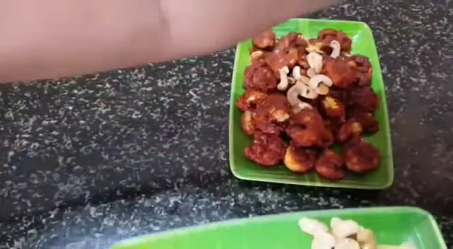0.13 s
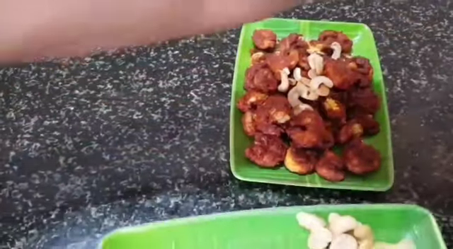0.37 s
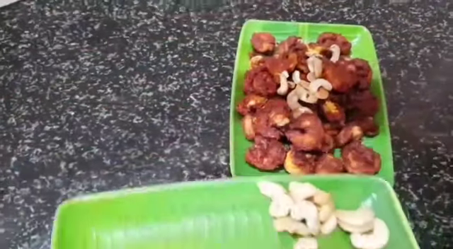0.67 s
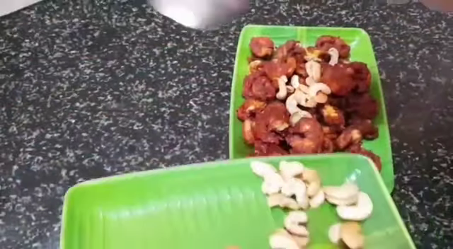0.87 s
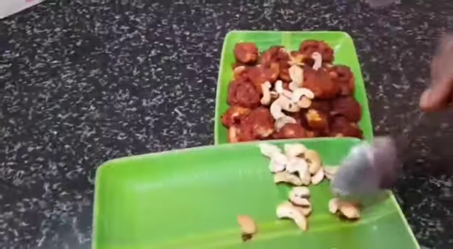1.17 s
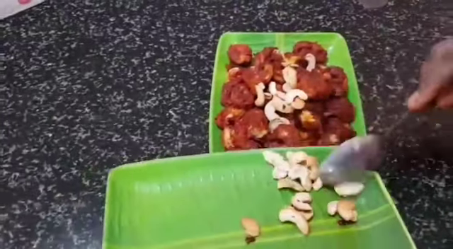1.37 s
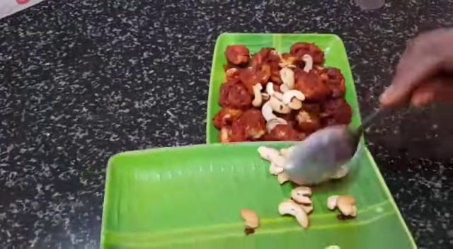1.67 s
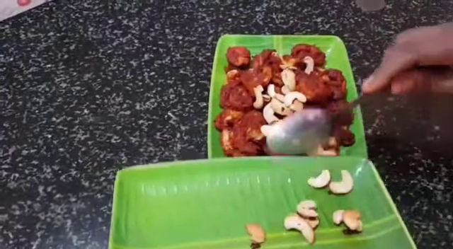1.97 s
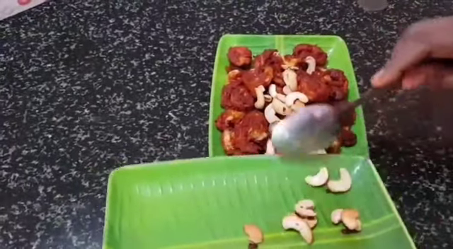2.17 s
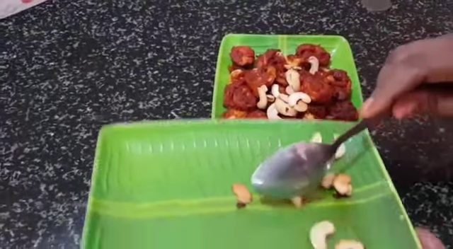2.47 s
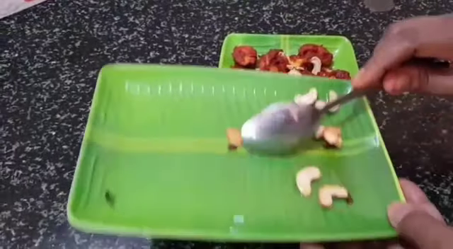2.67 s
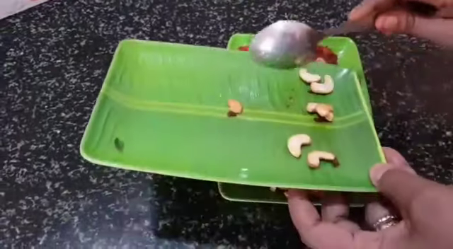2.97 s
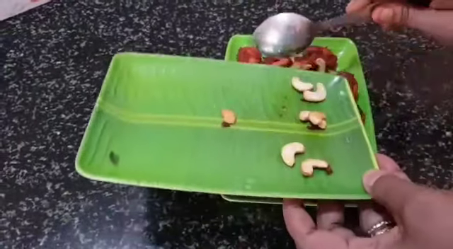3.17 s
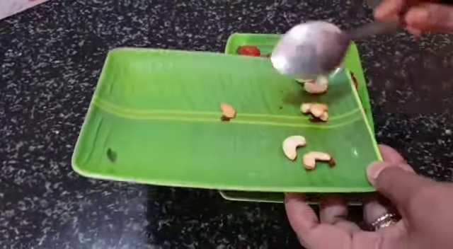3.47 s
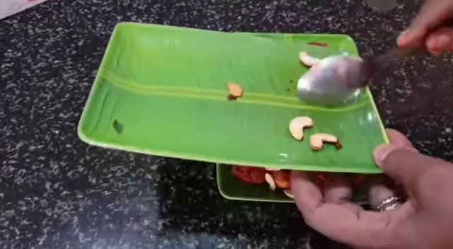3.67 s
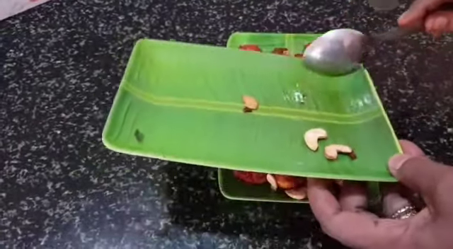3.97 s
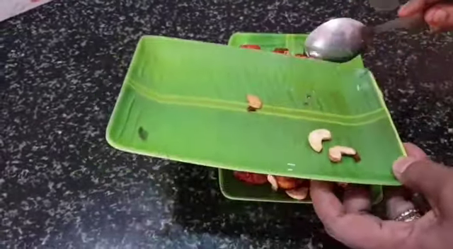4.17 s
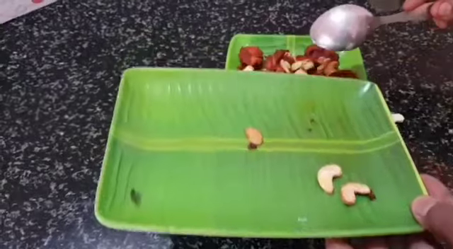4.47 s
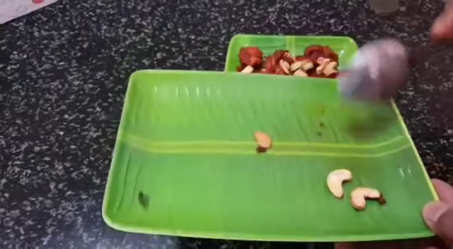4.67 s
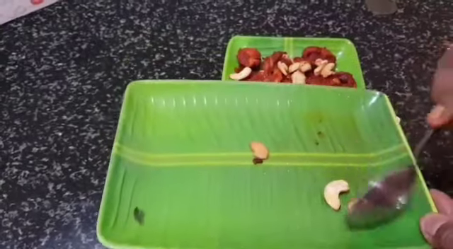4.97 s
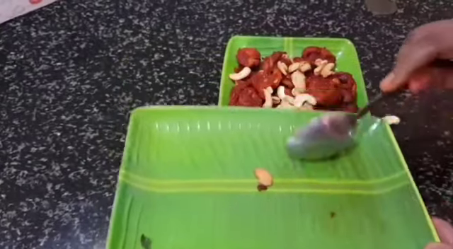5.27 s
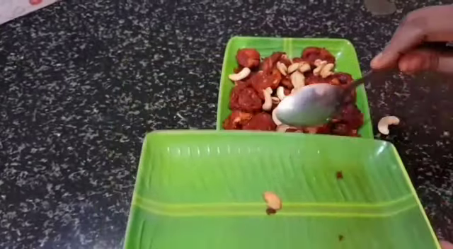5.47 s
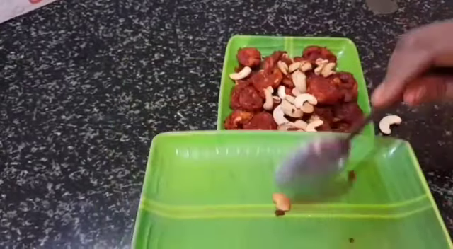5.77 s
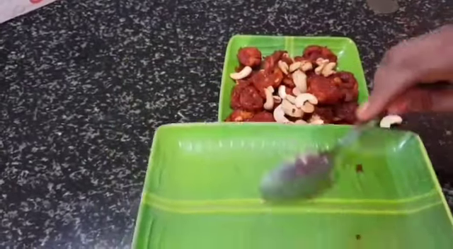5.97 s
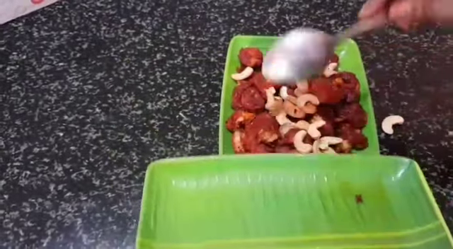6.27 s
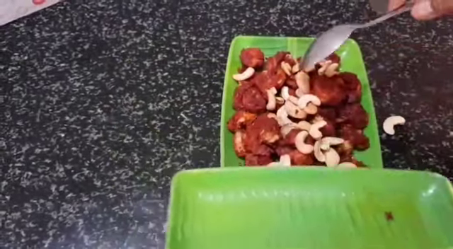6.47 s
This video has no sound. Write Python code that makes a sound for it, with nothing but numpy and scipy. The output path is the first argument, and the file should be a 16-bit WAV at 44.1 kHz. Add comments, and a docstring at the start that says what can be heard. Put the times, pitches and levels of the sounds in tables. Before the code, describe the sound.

Quiet room air with low rumble at first; small high metallic jingles, a muffled handling bump on the right, then delicate nut taps. Spoon strikes on a plastic plate follow, sharp and hollow with brief rings, some dragging into gritty scrapes. The plate knocks a lower-sounding dish, a nut clicks down, and a faint low hum swells between hits. Close stereo, lively reflections.

```python
"""A steel spoon pushes nuts off a hard plastic plate held over a stone counter in a small, bright kitchen.
Blows and scrapes drive three bands of plate crack and a bank of ringing modes; free blows tick brightly,
blows during a slide are duller. Nuts, dish and spoon add chattering cracks and their own modes, and cracks
feed a noise-built room. Earlier, thin metal jingles twice and the right microphone takes a soft thump made of
damped swings and rubbing noise. Noise makes the air and rumble; a wavering tone makes a hum that swells."""
import sys
import numpy as np
from scipy import signal
from scipy.fft import rfft, irfft, next_fast_len
from scipy.io import wavfile
from scipy.ndimage import uniform_filter1d

SR = 44100
rng = np.random.default_rng(int(sys.argv[2]) if len(sys.argv) > 2 else 0)


def file_out(sig):
    """Save sig as 16-bit WAV at sys.argv[1]."""
    # one column per channel
    cols = np.atleast_2d(sig).T
    # limit, then scale
    lim = np.clip(cols, -1, 1)
    pcm = np.round(lim * 32767).astype(np.int16)
    wavfile.write(sys.argv[1], SR, pcm)


N = 291501
RING = 2 ** 15  # samples given to each contact and its ring
TIME = np.arange(N) / SR
AGE = np.arange(RING) / SR

# Levels are gains going into each source; its own trims, bands and pan come on top.
# steady air of the room, relative spectrum: pitch_hz, density_db
AIR_SPECTRUM = [(25, -16), (55, -4.5), (110, -3.5), (180, 1), (270, -9), (390, -7), (600, -20),
                (1200, -25.5), (2500, -29.5), (5000, -32), (8000, -39), (16000, -38.5)]
AIR_DB = -61
# level of the room's low rumble, strongest at first: time_s, level_db
RUMBLE_LEVEL = [(0, -56), (1.3, -55.5), (2.2, -69.5), (6.6, -67.5)]
RUMBLE_TOP_HZ = 600
# swells of the low hum: start_s, length_s, level_db
HUM_SWELLS = [(2.147, 0.22, -60.5), (3.403, 0.16, -49), (3.865, 0.17, -54.5), (4.263, 0.15, -51),
              (5.201, .18, -52), (5.49, 0.13, -50.5), (5.864, 0.13, -52), (6.223, 0.15, -52),
              (6.552, .1, -52.5)]
HUM_HZ = 99.5  # centre of the wavering tone
HUM_ATTACK_S, HUM_RELEASE_S, HUM_REST_DB = 0.072, 0.065, -67.5

# soft bumps on the right microphone: start_s, level_db, rise_s
BUMPS = [(0.662, -20.5, 0.0028), (.714, -18, 0.0014), (.7262, -14, 0.00013), (.744, -15, 0.0013),
         (.777, -22, 0.00013)]
# what each bump sets swinging: pitch_hz, level_db, t60_s
BUMP_MODES = [(81.5, -4, 0.2), (113, 4.5, 0.063), (200, -1.5, 0.082), (432, 5, 0.0056)]
BUMP_LEFT_DB = -27.5  # left microphone relative to the right
# skin on the microphone case, relative spectrum: pitch_hz, density_db
RUB_SPECTRUM = [(30, -7.5), (100, -8), (220, -4.5), (400, -8), (800, -29), (1500, -50.5), (4000, -62.5)]
# hard blows also reach the microphones as a dull thud: start_s, level_db
THUDS = [(3.769, -37.5), (3.846, -45), (6.029, -42.5)]
THUD_HZ, THUD_T60_S, THUD_PAN_DB = 49.7, 0.29, 5

# thin metal jingling: start_s, level_db, chatter_s
JINGLES = [(.072, -56, 0.0058), (.088, -46, 0.01), (.324, -48, 0.0061), (.336, -39, 0.015),
           (.357, -35, 0.008)]
# notes of the thin metal: pitch_hz, level_db, t60_s
JINGLE_MODES = [(2280, -16, 0.18), (6060, -9, 0.28), (9900, -8, 0.18), (10600, -4, 0.09), (11080, 8, 0.067),
                (14540, 4, 0.18), (15000, -9, 0.17), (15402, 1, .15)]
# crack of the thin metal: pitch_hz, level_db
JINGLE_CRACK = [(500, -12), (2000, -14.5), (5000, -13), (6200, -6), (8300, -13), (10300, -5), (12500, -9),
                (14600, -22), (16000, -1.5)]

# the plate touches the full dish below: start_s, level_db, contact_s
DISH_TOUCHES = [(2.0153, -36.5, 0.0017), (2.044, -52, 0.0021), (2.42, -65, 0.0013), (2.7195, -32.5, 0.0022),
                (3.023, -43.5, 0.00071), (3.06, -41.5, 0.027), (3.8463, -39, 0.0017), (4.075, -47.5, 0.02),
                (5.047, -41, 0.0013)]
# notes of the dish: pitch_hz, level_db, t60_s
DISH_MODES = [(414, -20, .25), (386, -18, 0.19), (487, -1.5, 0.47), (528, 2, 0.34), (524, 1.5, 0.26),
              (965, 3.5, 0.28), (2400, -2, 0.37), (2617, -13, 0.19), (3300, -14, 0.18)]
# crack of the dish: pitch_hz, level_db
DISH_CRACK = [(150, -30), (330, -3.5), (480, 4), (700, -4), (1400, -13), (5000, -38)]

# a nut falls and bounces with a dry click: start_s, level_db, contact_s
DROPS = [(2.328, -54, 0.0061), (2.345, -42, 0.0086), (2.39, -51.5, 0.0047), (4.237, -37, 0.0012),
         (4.247, -39.5, 0.0034), (4.292, -43, 0.0029)]
# notes of the falling nut: pitch_hz, level_db, t60_s
DROP_MODES = [(786, 22, 0.052), (1730, -3, .04), (2200, -1, .04), (2560, -1, .04), (3020, -1, .04),
              (3280, -3, .04)]
# click of the falling nut: pitch_hz, level_db
DROP_CRACK = [(400, -22.5), (750, 11.5), (1200, -15.5), (2200, 9.5), (3200, 0.5), (5000, -6.5), (8000, -25),
              (16000, -43)]

# the clearest taps of nuts tumbling ahead of the spoon: start_s, level_db
NUTS = [(1.329, -60), (1.367, -57), (1.415, -62), (1.513, -51.5), (1.535, -56.5), (1.588, -48.5),
        (1.617, -55), (1.88, -68), (1.943, -58)]
# hollow notes of their soft taps: pitch_hz, level_db, t60_s
NUT_MODES = [(926, 4.5, 0.074), (945, -5, .09), (1104, -4, 0.06), (1465, -4, 0.093), (1640, -13, 0.072),
             (2220, 8.5, 0.023)]
# crack of a nut tap: pitch_hz, level_db
NUT_CRACK = [(300, -16), (700, -40), (1000, 22), (1300, -9), (1600, 9), (2000, -15), (2600, -11),
             (7000, -25), (16000, -14)]
NUT_CONTACT_S = 0.003
# lighter taps fill the push: start_s, end_s
TUMBLE_SPAN_S = (1.42, 1.78)
TUMBLE_DB = -60.5  # middle of their random levels

# the spoon's own bright clink: start_s, level_db, contact_s
CLINKS = [(2.7205, -30.5, 0.0012), (3.071, -41.5, 0.0058), (3.7695, -30, .005), (4.064, -54, 0.0032),
          (4.079, -42.5, 0.0042), (5.307, -37, 0.0037), (6.072, -30.5, 0.0031), (6.237, -44.5, 0.0034)]
# notes of the spoon: pitch_hz, level_db, t60_s
SPOON_MODES = [(1778, -1.5, 0.25), (3120, -3, .25), (4157, 0.5, .1), (4040, -1.5, 0.62), (4270, -2.5, 0.28),
               (4540, -3.5, 0.3), (4730, -2.5, .25), (6670, -5.5, 0.22), (9530, -9, .25)]
# crack of the spoon: pitch_hz, level_db
SPOON_CRACK = [(600, -21.5), (2500, -8), (3300, -13), (3950, 5.5), (4700, -2), (5700, -8.5), (7300, -10),
               (8200, -14.5), (16000, -20)]

# spoon strikes the plate: start_s, strength_db, hardness_db (low knock to steel clack),
# free_db (how freely the plate rings)
BLOWS = [(1.367, -45.5, 1, 4.5), (1.412, -47, 4, -4), (2.0141, -28, 4, -1), (2.045, -36, 7.5, 1.5),
         (2.345, -44.5, -1, 4.5), (2.42, -57, -15.5, 2), (2.574, -75, 9.5, -15), (2.7197, -23, -3.5, 5),
         (2.739, -32.5, -8.5, -19), (2.856, -34, -6.5, -13), (3.023, -31, -0.5, -6), (3.05, -36, 6, 3),
         (3.7669, -20, 3, -3.5), (3.799, -37, 14, 8), (3.8465, -22, 0, -15), (4.063, -39, 4, 1.5),
         (4.08, -43, 7, 3), (4.237, -48.5, 5, -17), (4.247, -40, -2, 4), (5.047, -36, -5.5, -5),
         (5.134, -35.5, -3, -1), (5.199, -27, -3.5, 7), (5.235, -22, -1, 1), (5.266, -27.5, -7, 9.5),
         (5.3054, -20, -3, -14), (5.335, -33, -6.5, -9), (5.461, -51.5, 4, -1), (6.0275, -23.5, -5.5, 9.5),
         (6.0625, -27, -7.5, -4), (6.07, -17, -3.5, -3.5), (6.1146, -23.5, -7, -4.5),
         (6.1275, -26.5, -9.5, -10), (6.143, -36, -7.5, 8), (6.218, -35, -1, 14), (6.238, -32.5, -4, 9.5)]
# spoon and nuts dragged over the plate: start_s, length_s, strength_db, grit_db (low groan to hiss)
SCRAPES = [(1.32, 0.22, -69.5, -5), (1.458, 0.3, -72, -3.5), (1.933, 0.15, -68.5, -7.5),
           (2.021, 0.048, -53.5, 5), (2.324, .071, -65.5, -3.5), (2.724, 0.044, -45.5, -9),
           (2.849, 0.033, -45, -11), (2.884, 0.129, -48, -6.5), (3.033, .048, -49, 0.5),
           (3.342, 0.15, -74.5, 0), (3.773, 0.02, -36, -2), (3.844, 0.1, -48, -5.5),
           (4.05, 0.033, -50.5, -2.5), (4.26, .17, -69.5, 1), (5.059, 0.25, -47.5, -5),
           (5.218, 0.023, -41, -10), (5.25, .17, -47.5, -9), (6.036, 0.055, -38.5, -3),
           (6.11, 0.03, -38.5, -10), (6.213, 0.034, -51, 0), (6.541, 0.034, -74, 7)]
# what plate and spoon ring with: pitch_hz, level_db, t60_s
PLATE_MODES = [(524, 5.5, 0.49), (544, 9.5, 0.27), (615, -3.5, 0.12), (673, -3.5, .25), (716, -16.5, .25),
               (840, 0, 0.067), (785, -14.5, 0.52), (843, -16, 0.38), (1037, -4, 0.35), (1122, -10, 0.13),
               (1510, -20.5, .25), (1623, 2, 0.3), (1575, -4, .25), (2046, -3, 0.15), (2454, -1, .2),
               (2540, -6.5, 0.35), (2575, -9, 0.26), (3022, -5.5, .3), (4010, 8, .07), (4000, -2.5, .25),
               (4830, -12, 0.27), (5450, -5.5, 0.23), (6160, -3.5, 0.2), (7450, -9.5, 0.19),
               (7800, -16, .3), (10800, -7.5, 0.33), (11490, -8.5, .25)]
# short crack of a contact on the plate: pitch_hz, level_db
PLATE_CRACK = [(100, -26), (380, -13), (540, 5.5), (900, 6.5), (1400, -1), (2100, -2), (2850, -5.5),
               (3900, -3.5), (5600, -1.5), (7200, -3), (8100, -10.5), (11500, -8.5), (16000, -18.5)]
# edges between knock, clack and tick: low_edge_hz, high_edge_hz
SPLITS_HZ = [1160, 3660]
# the tick relative to the clack: landing from free air, and while already sliding
FREE_TICK_DB, SLIDING_TICK_DB = 1.5, -10.5
LIFT_S = .02  # a slide still counts this long after its end

# the short dropout near the end: start_s, end_s
SILENCE = (6.447, 6.536)
TOP_HZ = 16100


def undb(db):
    """Decibels to gain."""
    return 10 ** (np.asarray(db) / 20)


def curve(rows):
    """Join (time_s, value) rows by straight lines."""
    return np.interp(TIME, *np.transpose(rows))


def unit(x):
    """Scale to energy 1 a channel, on average."""
    return x / np.sqrt(np.mean(np.sum(np.abs(x) ** 2, axis=-1)))


def fade(t60):
    """Exponential decay, 60 dB down after t60 seconds."""
    return np.exp(-np.log(1000) * AGE / t60)


def gains(points, size):
    """A (pitch_hz, level_db) spectrum on the bins of a transform."""
    hz, db = np.transpose(points)
    bins_hz = np.fft.rfftfreq(size, 1 / SR)
    return undb(np.interp(np.log(bins_hz + 1), np.log(hz), db))


def click(points):
    """The causal minimum-phase pulse that has this spectrum, at energy 1."""
    cepstrum = irfft(np.log(gains(points, RING)))
    cepstrum[1:RING // 2] *= 2
    cepstrum[RING // 2 + 1:] = 0
    return unit(irfft(np.exp(rfft(cepstrum))))


def pair(size, apart_hz):
    """White noise at two microphones: alike in the bass, increasingly unrelated above apart_hz."""
    mid, side = rfft(rng.standard_normal((2, size)))
    alike = 1 / (1 + (np.fft.rfftfreq(size, 1 / SR) / apart_hz) ** 2)
    mid = mid * np.sqrt((1 + alike) / 2)
    side = side * np.sqrt((1 - alike) / 2)
    return irfft(np.array([mid + side, mid - side]), size)


def noise(points, apart_hz):
    """Coloured stereo noise, rms 1."""
    size = next_fast_len(N, True)
    x = irfft(rfft(pair(size, apart_hz)) * gains(points, size), size)[:, :N]
    return x / x.std()


def pan(db):
    """Channel gains for a left-minus-right level."""
    return undb(np.array([[db], [-db]]) / 2)


def add(track, s, x):
    """Mix x into the track from time s."""
    start = int(s * SR)
    track[:, start:start + RING] += x[:, :N - start]


def hum_level():
    """Each swell rises, holds and dies back to a faint rest level."""
    swells = sum(undb(db) * np.interp(TIME - s, [-HUM_ATTACK_S, 0, length, length + HUM_RELEASE_S], [0, 1, 1, 0])
                 for s, length, db in HUM_SWELLS)
    return np.maximum(swells, undb(HUM_REST_DB))


def hum(hum_db=-3, waver_hz=5, hum_grain=.7):
    """A tone whose pitch wanders at random, roughened by low noise, follows the swells."""
    drift = np.interp(TIME, np.linspace(0, TIME[-1], num=80), rng.standard_normal(80))
    tone = np.sqrt(2) * np.sin(2 * np.pi * np.cumsum(HUM_HZ + waver_hz * drift) / SR)
    grain = noise([(40, -12.5), (90, 3), (125, -5.5), (200, -9.5), (400, -49), (1000, -84.0)], 600)
    return undb(hum_db) * hum_level() * (tone + hum_grain * grain)


def room_air(air_pan_db=-1.5):
    """Steady coloured noise is the air; a second, low-passed layer is the changing rumble."""
    low_pass = signal.butter(2, RUMBLE_TOP_HZ, fs=SR, output="sos")
    rumble = undb(curve(RUMBLE_LEVEL)) * signal.sosfilt(low_pass, noise(AIR_SPECTRUM, 610))
    return (undb(AIR_DB) * noise(AIR_SPECTRUM, 520) + rumble) * pan(air_pan_db)


def kitchen(x, t60_s=0.51, treble_t60_s=0.25, damp_hz=7000, early_s=0.36, early=1.0, gap_s=0.00047,
            wet_db=0.0, bass_db=-7):
    """Close reflections from counter and tiles, then a diffuse tail; the plate sends out little bass."""
    echoes = irfft(rfft(pair(RING, 750)) * gains([(800, bass_db), (1800, 0.0022)], RING))
    dull = signal.sosfilt(signal.butter(1, damp_hz, fs=SR, output="sos"), echoes)
    tail = dull * fade(t60_s) + (echoes - dull) * fade(treble_t60_s)
    onset = np.clip(AGE / gap_s - .5, 0, 1)
    response = unit((tail + early * echoes * fade(early_s)) * onset)
    return undb(wet_db) * signal.fftconvolve(x, response, axes=1)[:, :N]


def thump(rub=.3, rub_s=0.12, low_hz=38, soft_hz=600):
    """A bump presses on the microphone in a damped push and rubs the case; its softness leaves little treble."""
    pushes, pressure = np.zeros((2, 2, N))
    swing = sum(undb(db) * np.sin(2 * np.pi * hz * AGE) * fade(t60) for hz, db, t60 in BUMP_MODES)
    for s, db, rise_s in BUMPS:
        size = undb([[db + BUMP_LEFT_DB], [db]]) * (1 - np.exp(-AGE / rise_s)) ** 2
        add(pushes, s, -size * swing)
        add(pressure, s, size * fade(rub_s))
    for s, db in THUDS:
        size = undb(db) * pan(THUD_PAN_DB)
        add(pushes, s, -size * np.sin(2 * np.pi * THUD_HZ * AGE) * fade(THUD_T60_S))
        add(pressure, s, size * fade(rub_s))
    softness = signal.butter(3, [low_hz, soft_hz], "band", fs=SR, output="sos")
    return signal.sosfilt(softness, pushes + rub * pressure * noise(RUB_SPECTRUM, 530))


def chatter(length, apart_hz=1100, rise=1.0):
    """Hard surfaces rattle against each other: a short noise burst of energy 1."""
    age = AGE / length
    return unit(pair(RING, apart_hz) * np.exp(-age ** 2) * (1 - np.exp(-age / rise)))


def ringer(modes):
    """One decaying oscillation for each mode; their energies sum to 1."""
    rings = np.array([undb(db) * unit(np.exp(2j * np.pi * hz * AGE) * fade(t60)) for hz, db, t60 in modes])
    return rings / np.sqrt(np.sum(rings.imag ** 2))


def struck(rings, modes, scatter_db=2, apart_hz=1000, spread_s=0.0044):
    """Each hit wakes the modes differently; they build up as waves spread, high ones out of step in stereo."""
    size, skew = rng.standard_normal((2, len(modes)))
    turn = skew * (np.array(modes)[:, 0] / apart_hz) ** 2 / 2
    weights = undb(scatter_db * size) * np.exp(1j * np.array([turn, -turn]))
    return (weights @ rings).real * (1 - np.exp(-AGE / spread_s)) ** 2


def taps(events, modes, colour, ring_db, pan_db, level_span_s=0.0097):
    """Light contacts on one object: returns the cracks and the ringing that builds up during each."""
    crack, rings = rfft(click(colour)), ringer(modes)
    cracks, ringing = np.zeros((2, 2, N))
    for s, db, length in events:
        size = undb(db) * np.sqrt(level_span_s * SR) * pan(pan_db)
        add(cracks, s, size * unit(irfft(rfft(chatter(length)) * crack)))
        add(ringing, s, size * struck(rings, modes) * (1 - np.exp(-2 * AGE / length)))
    return np.array([cracks, undb(ring_db) * ringing])


def jingle():
    """Thin metal chatters and rings high and briefly."""
    return taps(JINGLES, JINGLE_MODES, JINGLE_CRACK, ring_db=6, pan_db=0.5)


def dish():
    """The plate knocks on the full dish, which answers mostly with low notes."""
    return taps(DISH_TOUCHES, DISH_MODES, DISH_CRACK, ring_db=4, pan_db=-2.0)


def falling_nut():
    """A bouncing nut clicks dryly, its short notes kept low in level."""
    return taps(DROPS, DROP_MODES, DROP_CRACK, ring_db=-15, pan_db=-5)


def tumble(count=14, scatter_db=2):
    """The clear taps of the nuts, and lighter ones at uneven steps through the push."""
    when, size = rng.random((count, 2)).T
    times = np.interp(np.arange(count) + when, [0, count], TUMBLE_SPAN_S)
    light = list(zip(times, TUMBLE_DB + scatter_db * (2 * size - 1)))
    return [(s, db, NUT_CONTACT_S) for s, db in list(NUTS) + light]


def tumbling_nuts():
    """Nuts tap softly with hollow, quickly damped notes."""
    return taps(tumble(), NUT_MODES, NUT_CRACK, ring_db=8, pan_db=-2)


def clinks():
    """The steel spoon cracks brightly and rings with its own modes."""
    return taps(CLINKS, SPOON_MODES, SPOON_CRACK, ring_db=-1.5, pan_db=-3.5)


def sliding(s):
    """Whether the spoon is being dragged over the plate at this moment, or was just before."""
    return any(start <= s <= start + length + LIFT_S for start, length, *_ in SCRAPES)


def blow_force(s, strength_db, hard_db, free_db, chatter_s=0.0038, level_span_s=0.003, knock_ring=0.5, flex=0.86):
    """One clean push flexes and rings the plate while the steel edge chatters: returns crack and ring drives."""
    push = np.tile(1. * (AGE == 0), (2, 1))
    rattle = chatter(chatter_s)
    tick_db = SLIDING_TICK_DB if sliding(s) else FREE_TICK_DB
    levels_db = strength_db + np.array([-hard_db, hard_db, hard_db + tick_db])  # knock, clack, tick
    size = np.sqrt(level_span_s * SR) * undb(levels_db)[:, None, None]
    force = size * np.array([flex * push, rattle, rattle])
    drive = size * undb(free_db) * np.array([knock_ring * push, push, push])
    return force, drive


def scrape_force(length, strength_db, grit_db, slips_hz=700, uneven_db=3, hiss=(.35, .9, 2.2),
                 treble_db=1.93, ring=1.3):
    """Stick and slip: uneven catches blur into hiss towards the treble and keep the modes ringing."""
    slips = rng.random(RING) < slips_hz / SR  # slips_hz is the average rate
    catches = slips * undb(uneven_db * rng.standard_normal(RING)) * rng.choice([-1, 1], RING)
    stroke = np.sqrt(np.maximum(np.sin(np.pi * np.minimum(AGE / length, 1)), 0))
    coarse, fine = unit(catches * stroke), unit(pair(RING, 610) * stroke)
    levels_db = strength_db + np.array([-grit_db, grit_db, grit_db + treble_db])
    bands = [undb(db) * unit(coarse + share * fine) for db, share in zip(levels_db, hiss)]
    force = np.sqrt(length * SR) * np.array(bands)
    return force, ring * force


def plate_bands(crack, pans_db):
    """Split the plate's response into knock, clack and tick, each panned and at equal crack energy."""
    hz = np.fft.rfftfreq(RING, 1 / SR)
    edges = ((SPLITS_HZ[0], "low"), (SPLITS_HZ, "band"), (SPLITS_HZ[1], "high"))
    filters = [signal.butter(2, edge, kind, fs=SR) for edge, kind in edges]
    bands = np.array([signal.freqz(b, a, hz, fs=SR)[1] for b, a in filters])
    bands[1] *= -1  # neighbouring bands add in step
    return np.array([band / np.linalg.norm(irfft(band * crack)) * pan(db) for band, db in zip(bands, pans_db)])


def spoon_on_plate(ring_db=-4.0, knock_pan_db=2.0, clack_pan_db=-2, tick_pan_db=-2, held_db=-5):
    """Blows and scrapes force the plate in three bands: returns the cracks and the ringing."""
    crack, rings = rfft(click(PLATE_CRACK)), ringer(PLATE_MODES)
    bands = plate_bands(crack, (knock_pan_db, clack_pan_db, tick_pan_db))
    cracks, ringing = np.zeros((2, 2, N))
    # a spoon that stays on the plate holds back its lowest, bell-like modes
    held = rings * undb(np.interp(np.array(PLATE_MODES)[:, :1], [550, 700], [held_db, 0]))
    contacts = [(s, blow_force(s, *how), rings) for s, *how in BLOWS]
    contacts += [(s, scrape_force(*how), held) for s, *how in SCRAPES]
    for s, drives, modes in contacts:
        force, drive = (np.sum(rfft(x) * bands, axis=0) for x in drives)
        add(cracks, s, irfft(force * crack))
        add(ringing, s, irfft(drive * rfft(struck(modes, PLATE_MODES))))
    return np.array([cracks, undb(ring_db) * ringing])


def scene():
    """Everything on and around the counter; only the cracks wake the room."""
    small_contacts = jingle() + dish() + falling_nut() + tumbling_nuts() + clinks()
    cracks, ringing = spoon_on_plate() + small_contacts
    return cracks + ringing + kitchen(cracks) + thump() + hum() + room_air()


def record(dry):
    """The sound drops out for a moment near the end; the top is cut."""
    live = uniform_filter1d(1. * ((TIME < SILENCE[0]) | (TIME > SILENCE[1])), size=200)  # softened edges
    top_cut = signal.ellip(10, .2, 70, TOP_HZ, fs=SR, output="sos")
    return signal.sosfilt(top_cut, dry * live)


dry = scene()
out = record(dry)
file_out(out)
```